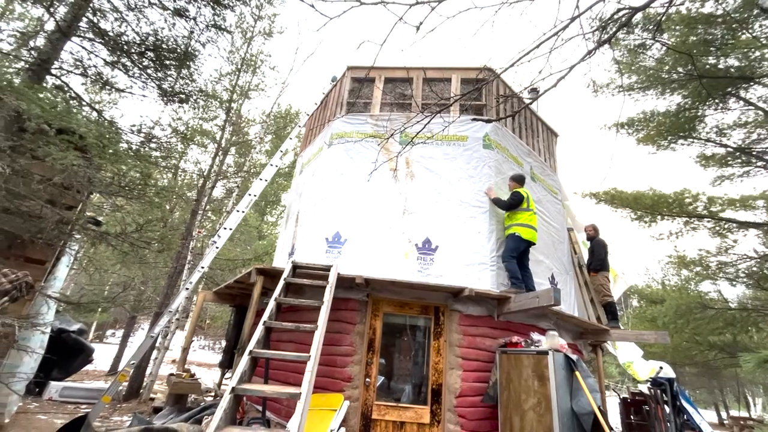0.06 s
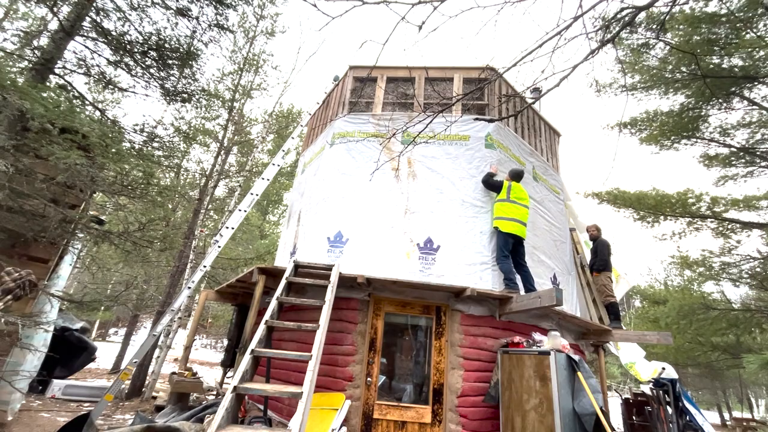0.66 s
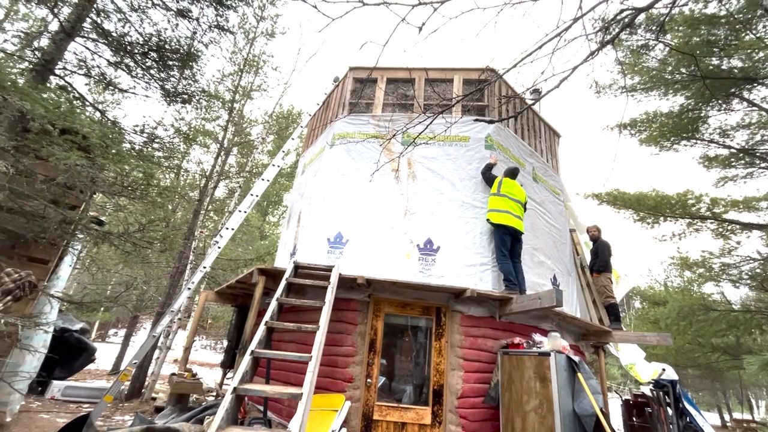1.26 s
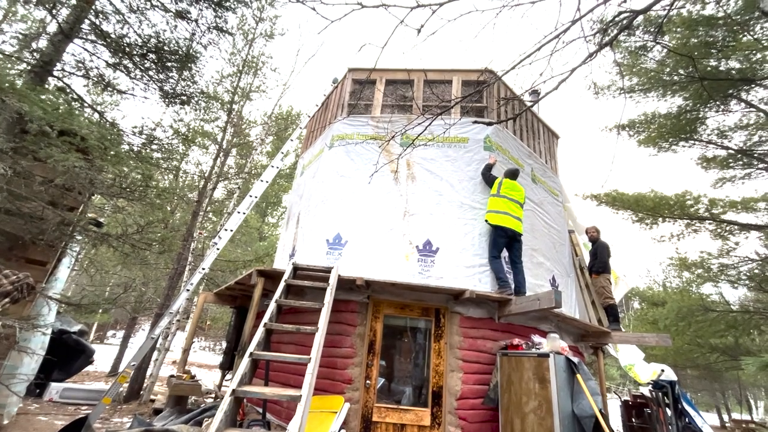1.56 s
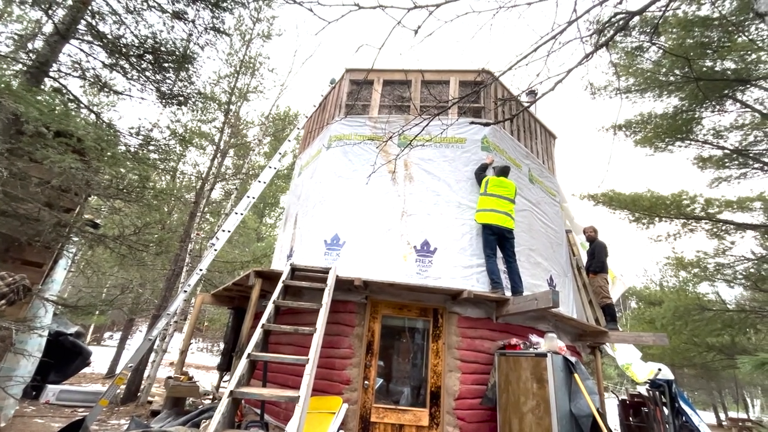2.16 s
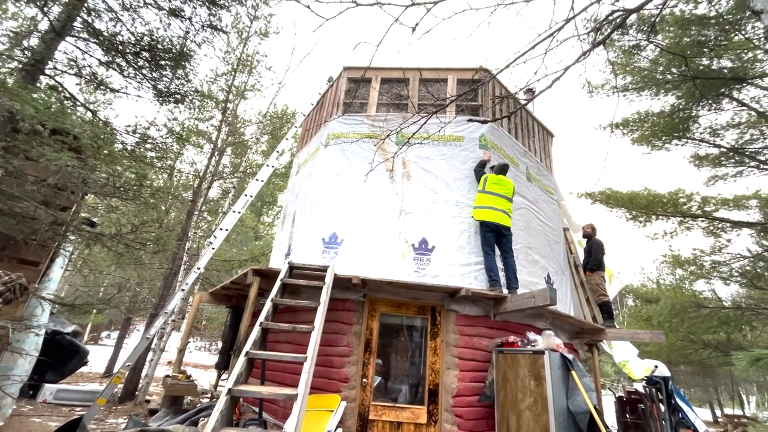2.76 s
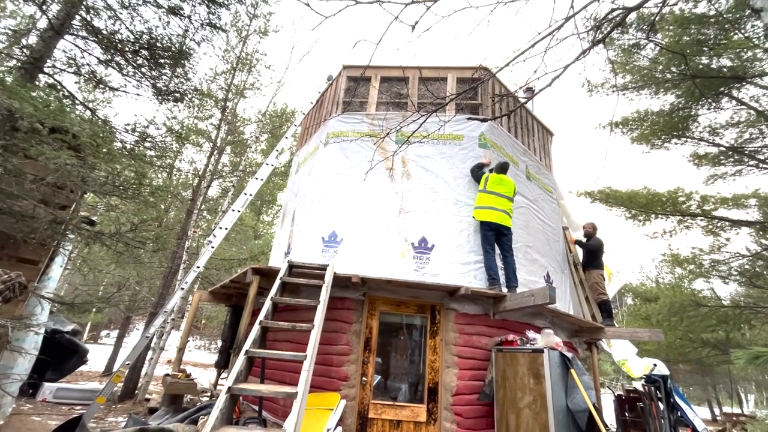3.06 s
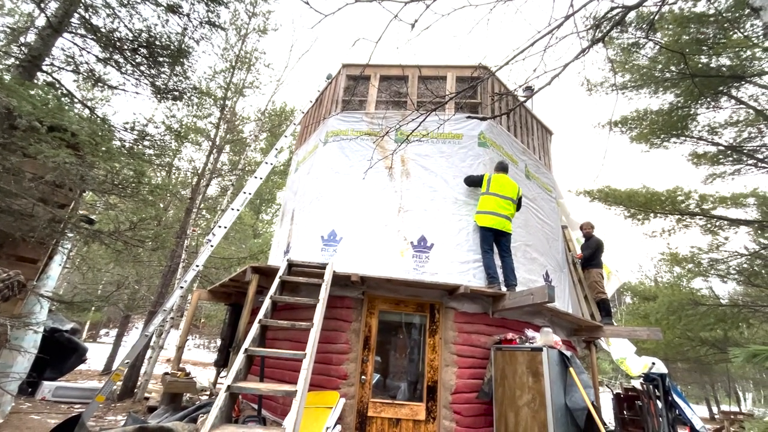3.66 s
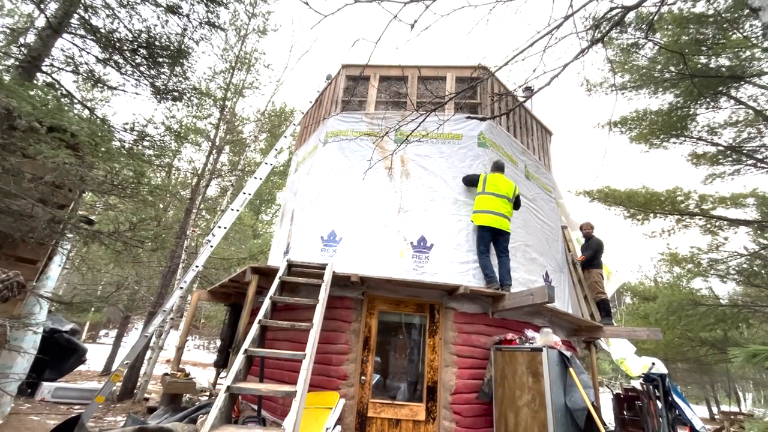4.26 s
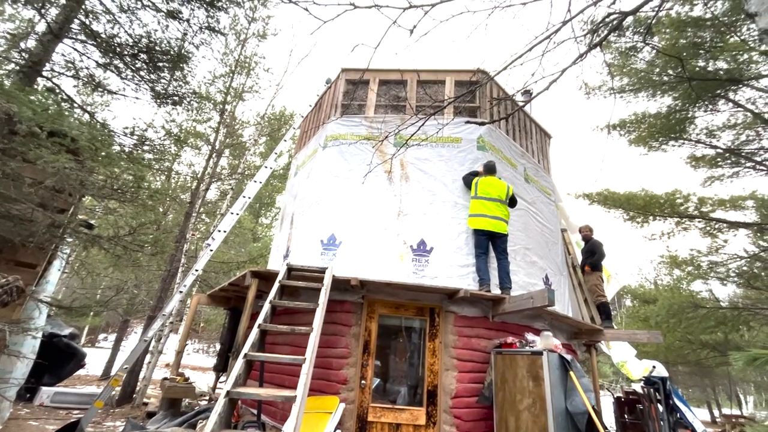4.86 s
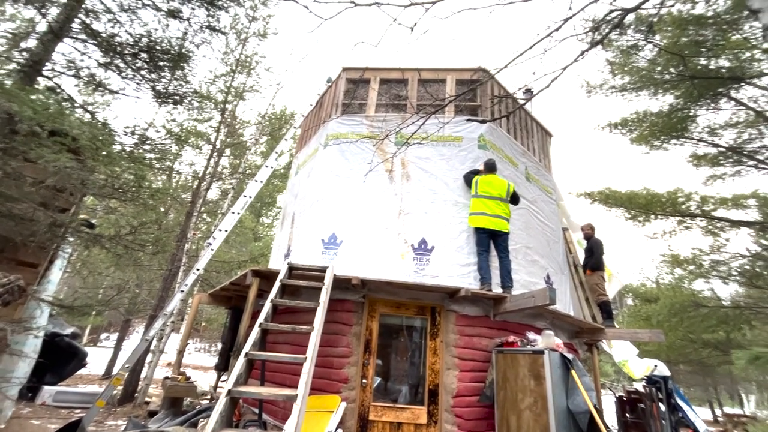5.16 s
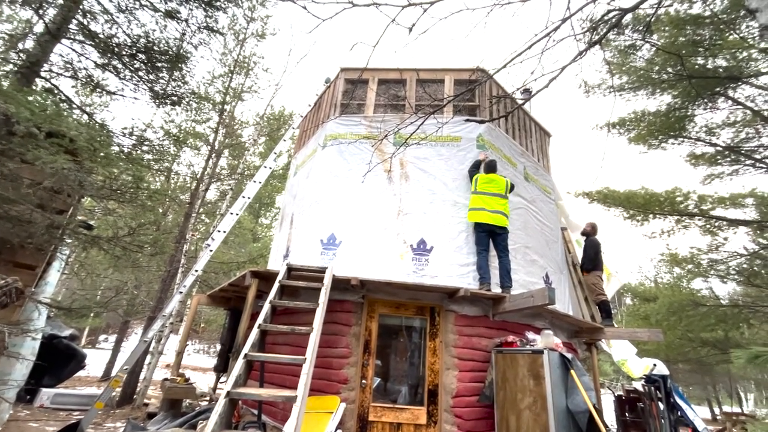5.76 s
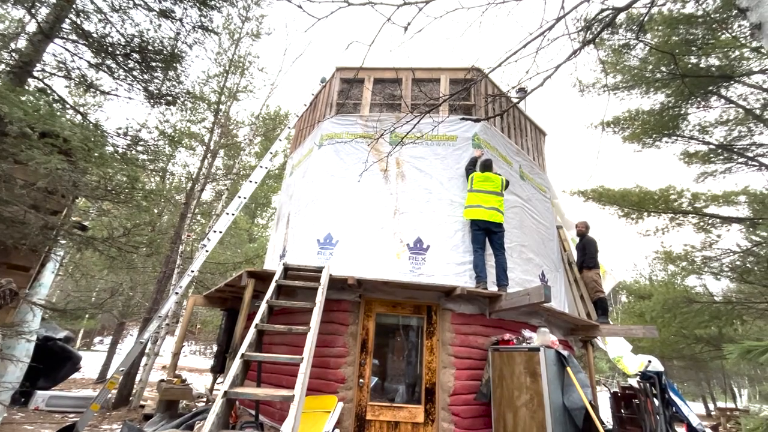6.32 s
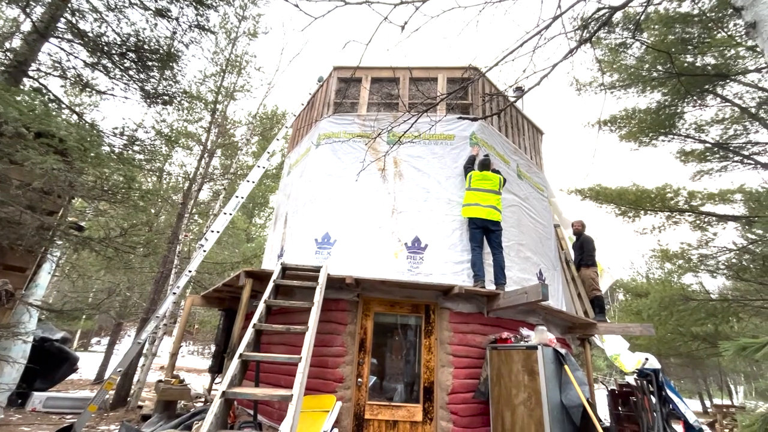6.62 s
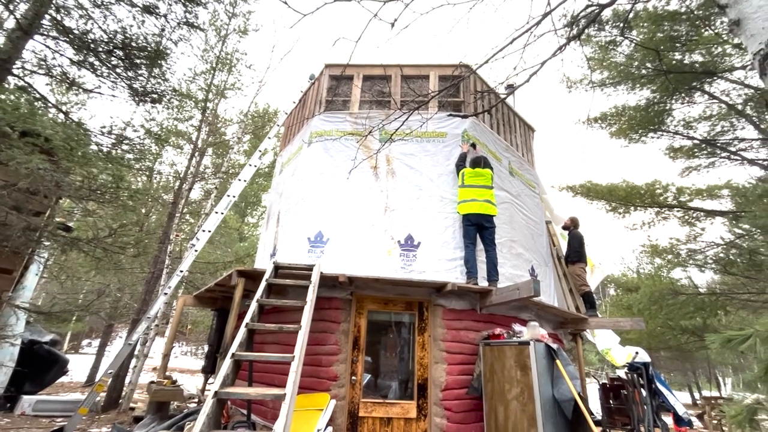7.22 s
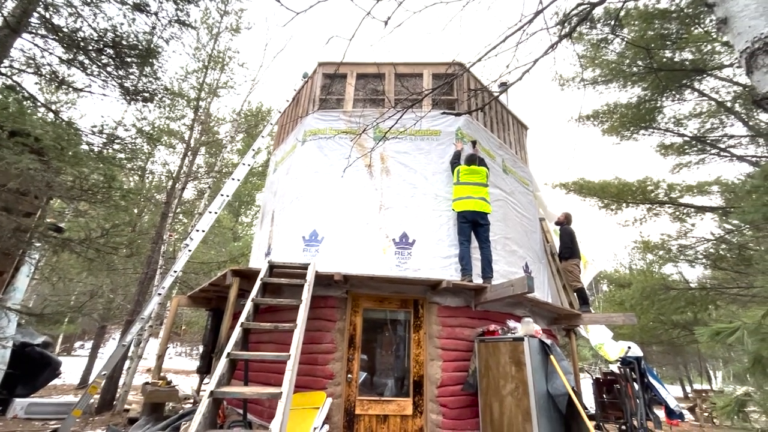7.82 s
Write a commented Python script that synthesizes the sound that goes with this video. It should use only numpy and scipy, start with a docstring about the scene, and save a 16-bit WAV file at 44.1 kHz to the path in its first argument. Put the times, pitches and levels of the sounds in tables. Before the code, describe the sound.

A staple gun snaps three times into a wooden wall outdoors, after faint rustling of plastic wrap, over a low steady engine hum.

```python
"""In a pine wood, over the throb of a far idling engine, a hand smooths house wrap on a cabin wall:
friction makes it hiss, folds crinkle, and hands and boots bump the boards. A small bird calls twice,
and a staple gun clicks as it is set in place. From five seconds on, some metres to the right, three
staples are shot into the boards. Each impact is a steel crack that sets gun and wall ringing in their
modes, and the trees scatter it back; between the shots the smoothing goes on."""
import sys
import numpy as np
from scipy import signal
from scipy.fft import rfft, irfft, next_fast_len
from scipy.io import wavfile
from scipy.ndimage import uniform_filter1d

SR = 44100
rng = np.random.default_rng(int(sys.argv[2]) if len(sys.argv) > 2 else 0)


def dump(signal):
    """Clip the signal to [-1, 1] and save it as 16-bit WAV at the path in sys.argv[1]."""
    limited = np.clip(np.atleast_2d(signal).T, -1, 1)
    pcm = np.round(limited * 32767).astype(np.int16)
    wavfile.write(sys.argv[1], SR, pcm)


N = 347810
TIME = np.arange(N) / SR

# The shots. Each row: start in seconds, burst length in seconds, crack level in dB, crack tilt in dB
# per octave, steel level in dB, wall level in dB, wall tilt in dB per octave, clatter level in dB.
SHOTS = [(5.0236, 0.0038, -20, -4, -41.5, -26, -2, -17), (6.3026, 0.0052, -14, 0, -29, -24, 1, -18),
         (7.61, .0044, -13.5, 2.8, -44.5, -26.5, -2, -19.5)]
# The driver meets the staple, seats it, hits its stop. Each row: fraction of the burst, gain in dB.
DRIVER_BLOWS = [(0, -5), (0.351, 0), (.85, -4.5)]
# Modes of steel gun and boarded wall. Each row: frequency in Hz, relative level in dB, T60 in seconds.
GUN_MODES = [(2030, -1, .15), (2950, 4.5, 0.28), (3314, 0.5, 0.27), (3680, 0, 0.18), (3940, -2.5, 0.26),
             (4257, -3, 0.16)]
WALL_MODES = [(199.9, -7, .4), (244.4, 1, .28), (303, 0.5, .3), (344.8, -1.5, .3), (547, 2, 0.11),
              (637, 3, 0.22), (914.5, 1.5, 0.18), (968, 0.5, 0.21), (1019, 0, 0.2)]
# Spectra of the crack, the sheet-steel housing and the echo from the trees.
# Each row: frequency in Hz, relative spectral density in dB.
CRACK_SPECTRUM = [(150, -20.5), (300, -1), (430, -3.5), (630, 4), (1500, -5.5), (2700, -6.5), (4000, -2.5),
                  (5200, -6.5), (8500, -13.5), (12000, -10), (16000, -27)]
HOUSING_SPECTRUM = [(2000, -19), (3000, -0.5), (4000, 0), (4600, -4), (5300, -25)]
ECHO_SPECTRUM = [(280, -14), (1000, 8), (1600, 0), (3900, -3), (6000, -8), (16000, -44)]
# Resonances of board and grip, one list for each shot. Each row: frequency in Hz, lift in dB.
SHOT_RESONANCES = [
    [(860, 7), (1060, 13.5), (3970, 11.5), (4330, 10), (5400, 6), (6330, 0.5)],
    [(770, -13), (905, 10.5), (3650, 10.5), (4270, 6.5), (6030, 8), (7680, 5.5)],
    [(268, 6.5), (720, -13), (850, 15.5), (3600, 1), (4060, 7), (4850, 8), (5450, 9.5)],
]

def staple_gun():
    """Impact excitation: spring-driven blows set gun and wall ringing; the trunks scatter it back."""
    out, t = np.zeros((2, N)), np.arange(2 ** 15) / SR
    for shot, resonances in zip(SHOTS, SHOT_RESONANCES):
        start, burst_s, crack_db, crack_tilt, steel_db, wall_db, wall_tilt, clatter_db = shot
        burst = sum(undb(db) * fade(t - place * burst_s, t60=.017) for place, db in DRIVER_BLOWS)
        crack = undb(crack_db) * noise(CRACK_SPECTRUM, len(t), crack_tilt) * burst
        # loosely joined steel parts split each mode into a close pair
        steel = sum(ring(GUN_MODES, t, scatter_db=3.5, rise_s=.00059, detune=.0027) for _ in range(2))
        wall = ring(WALL_MODES, t, scatter_db=1.5, rise_s=.0061, detune=.0043, tilt_db=wall_tilt)
        housing_decay = fade(t, t60=.09) + undb(-25) * fade(t, t60=.81)
        housing = undb(steel_db + 12.5) * noise(HOUSING_SPECTRUM, len(t)) * housing_decay
        ringing = housing + undb(wall_db) * wall + undb(clatter_db) * clatter(t)
        echo = undb(-45) * noise(ECHO_SPECTRUM, len(t)) * fade(t, t60=1.68) * rise(t, .03)
        coloured = resonate(crack, resonances) + resonate(ringing, resonances, share=.57)
        add(out, start, coloured + undb(steel_db) * steel + echo)
    return out

# Spectrum of the clatter. Each row: frequency in Hz, relative spectral density in dB.
CLATTER_SPECTRUM = [(40, -13), (80, -8), (130, -16), (270, 1), (450, -6), (630, -4.5), (1000, -6),
                    (1450, -10.5), (4000, -18), (5100, -20.5), (6400, -15.5), (9500, -26), (12000, -24),
                    (15500, -42.5)]
# Damping of the clatter. Each row: band centre in Hz, T60 in seconds.
CLATTER_T60 = [(80, 0.82), (280, 0.32), (900, 0.21), (3500, 0.31), (12000, 0.23)]

def clatter(t):
    """Modal overlap: boards, wrap and platform ring as noise whose lows build later and last longer."""
    hz, out = bins(len(t)), 0
    spectrum = rfft(noise(CLATTER_SPECTRUM, len(t), tilt_db=-.56)) * ripple(hz, depth_db=3)
    centres = np.array(CLATTER_T60)[:, 0]
    for (centre, t60), weights in zip(CLATTER_T60, np.eye(len(centres))):
        band = irfft(spectrum * at_hz(np.c_[centres, weights], hz), len(t))
        out = out + band * fade(t, t60) * rise(t, 1.5 / centre)
    return out

# Steel parts clicking as the gun is set to the wall, the wrap crinkling, hands and boots on the boards.
# Each row: time in seconds, relative level in dB.
GUN_CLICKS = [(2.6077, -39.5), (2.63, -40), (2.6459, -40.5), (4.6864, -44.5), (5.7324, -34.5),
              (6.8747, -28.5), (6.895, -35), (6.9316, -34), (6.954, -46)]
WRAP_CRINKLES = [(.432, -53), (.611, -43), (0.7592, -42.5), (0.8221, -39.5), (.902, -43), (.947, -51),
                 (1.2287, -50.5), (1.899, -47), (2.8499, -48.5), (3.0106, -43.5), (3.199, -44),
                 (3.381, -48.5), (4.458, -44.5), (4.483, -52), (5.4678, -43.5), (5.9356, -49), (6.021, -52)]
BOARD_BUMPS = [(0.431, -46.5), (1.605, -50.5), (0.824, -44), (1.189, -46), (1.363, -47.5), (1.947, -41),
               (2.402, -47.5), (2.48, -54), (3.385, -47), (3.564, -52), (3.729, -53), (4.424, -49),
               (4.965, -40)]
# Spectra of sharp ticks and dull bumps. Each row: frequency in Hz, relative spectral density in dB.
TICK_SPECTRUM = [(900, -6.5), (3500, -14), (4300, 4.5), (5400, -6), (6700, -4), (9500, -16), (12000, -9),
                 (16000, -18)]
BUMP_SPECTRUM = [(120, -7), (300, 5.5), (550, 0.5), (1050, 6), (1500, -12.5), (4000, -10), (10000, -29)]

def contacts():
    """Transient excitation: crinkles and clicks are brief and bright, bumps slower and duller."""
    crinkles = taps(WRAP_CRINKLES, TICK_SPECTRUM, rise_s=.00022, t60=.0084, tail_db=-15.5, tail_t60=.22)
    clicks = taps(GUN_CLICKS, TICK_SPECTRUM, rise_s=.00082, t60=.0094, tail_db=-22, tail_t60=.18)
    bumps = taps(BOARD_BUMPS, BUMP_SPECTRUM, rise_s=.0014, t60=.05, tail_db=-8.5, tail_t60=.59)
    return undb(3.5) * crinkles + undb(5) * clicks + undb(.5) * bumps

def taps(events, spectrum, rise_s, t60, tail_db, tail_t60):
    """Double-slope decay: each noisy contact dies quickly and leaves a faint tail off the wall."""
    out, t = np.zeros((2, N)), np.arange(2 ** 13) / SR
    envelope = (fade(t, t60) + undb(tail_db) * fade(t, tail_t60)) * rise(t, rise_s)
    for start, db in events:
        add(out, start - .001, undb(db) * noise(spectrum, len(t)) * envelope)
    return out

# Swells of hiss, mostly from smoothing the wrap; the one at 6.33 s is a faint hiss lingering after the
# second shot. The gun's nose scrapes once along the boards.
# Each row: start in seconds, length in seconds, relative level in dB, T60 of the run-out in seconds.
HISS_SWELLS = [(-.25, 0.61, -59, 3.4), (0.457, 0.47, -58.5, 1.6), (2.136, 0.27, -68, 3.6),
               (2.765, 0.016, -62, 0.16), (2.872, 0.25, -60, 6.1), (3.153, 0.18, -65.5, 1.1),
               (4.02, 0.1, -63, 0.94), (4.223, 0.34, -60.5, 0.49), (5.22, 0.45, -58.5, 1.4),
               (5.895, 0.23, -68, 0.24), (6.33, .2, -68.5, 11.3), (6.83, 0.22, -63.5, 1.2)]
NOSE_SCRAPE = (5.17, .52, -61.5, .7)
# Spectrum of the rubbing. Each row: frequency in Hz, relative spectral density in dB.
RUB_SPECTRUM = [(210, -17.5), (350, -5), (639, -5.5), (1020, -3), (1800, -13), (2900, -12.5), (4270, -9.5),
                (7440, -19), (11800, -21.5), (14000, -27.5)]
# Resonances of the taut wrap and of the scraping nose. Each row: frequency in Hz, lift in dB.
WRAP_RESONANCES = [(4400, -1), (5400, 3)]
SCRAPE_RESONANCES = [(1090, 19), (4300, 15)]

def rubbing(folds_per_s=110, fold_decay_s=.0011):
    """Stick-slip friction: wrap hisses, folds pop, the gun scrapes. A hiss also lingers after shot two."""
    stir = undb(-88)  # the loose wrap at rest
    envelope = np.sqrt(stir ** 2 + sum(swell(*row) ** 2 for row in HISS_SWELLS))
    slips = undb(2.1 * rng.exponential(size=N // 32 + 1)).repeat(32)[:N]
    pops = (rng.random(N) < folds_per_s / SR) * rng.random(N) ** 2
    folds = signal.lfilter([1], [1, -np.exp(-1 / (fold_decay_s * SR))], pops)
    hiss_spectrum = rfft(noise(RUB_SPECTRUM, N, grain=slips)) * ripple(bins(N), depth_db=3.5)
    hiss = irfft(hiss_spectrum, N) * undb(6 + wander(45))
    rustle = resonate(hiss, WRAP_RESONANCES) + undb(-8) * noise(TICK_SPECTRUM, N, grain=folds)
    scrape = resonate(noise(RUB_SPECTRUM, N, grain=slips * wander(330)), SCRAPE_RESONANCES)
    return rustle * envelope + scrape * swell(*NOSE_SCRAPE)

def swell(start, length, db, t60, attack_share=.58):
    """Amplitude envelope: the level builds, holds steady, then runs out."""
    t = TIME - start
    attack = np.sin(np.pi / 2 * np.clip(t / (attack_share * length), 0, 1))
    return undb(db) * attack * fade(np.maximum(t - length, 0), t60)

# Creaks of boards and wrap. Each row: time of the peak in seconds, half-width in seconds,
# frequency in Hz, frequency spread in Hz, level in dB.
CREAKS = [(0.003, .03, 283, 6, -38), (7.135, .04, 403, 6, -53), (7.14, .055, 2170, 150, -58)]

def creaks():
    """Narrow-band vibration: brief tones of unsteady pitch swell and fade."""
    out = 0
    for peak_s, half_width_s, hz, spread_hz, db in CREAKS:
        tone = np.sin(2 * np.pi * np.cumsum(hz + spread_hz * wander(spread_hz * 2)) / SR)
        out = out + undb(db) * tone * np.exp(-((TIME - peak_s) / half_width_s) ** 2)
    return out

# The bird's calls. Each row: start in seconds, level in dB.
BIRD_CALLS = [(1.455, -60), (4.824, -54)]
# Contour of one call. Each row: time from its start in seconds, frequency in Hz, gain in dB.
CALL_CONTOUR = [(0, 6400, -16), (0.012, 7200, -3), (0.031, 7080, -4), (.05, 7600, -5), (.11, 7500, -22)]

def bird():
    """Frequency and amplitude modulation: each thin call glides upward while its level flutters."""
    out, t = np.zeros((2, N)), np.arange(SR // 8) / SR
    times, hz, db = np.transpose(CALL_CONTOUR)
    tone = np.sin(2 * np.pi * np.cumsum(np.interp(t, times, hz)) / SR)
    for start, call_db in BIRD_CALLS:
        flutter = unit_rms(uniform_filter1d(rng.standard_normal((2, len(t))), size=160))
        add(out, start, tone * undb(call_db + np.interp(t, times, db)) * (1 + .5 * flutter))
    return out

# Idling speed. Each row: time in seconds, cycle rate in Hz.
IDLE_RATE = [(0, 22.65), (1.1, 22.8), (3, 22.9), (7.89, 22.85)]
# Harmonics of the exhaust. Each row: multiple of the cycle rate, relative level in dB.
EXHAUST_ORDERS = [(2, 1.5), (3, -7), (5, -1), (6, -8.5), (7, 0), (8, -3), (9, 0.5)]

def engine():
    """Harmonic series: only the low orders of the far exhaust pulses carry, each wavering on the way."""
    cycles = np.cumsum(np.interp(TIME, *np.transpose(IDLE_RATE))) / SR
    throb = 0
    for order, db in EXHAUST_ORDERS:
        smear = .22 * order ** 2  # the exhaust resonance shifts each phase, spreading the pulse
        throb = throb + undb(db + .7 * wander(3)) * np.cos(2 * np.pi * order * cycles + smear)
    return undb(-51) * unit_rms(throb)

# Spectra of the wood's air and its rumble. Each row: frequency in Hz, relative spectral density in dB.
AIR_SPECTRUM = [(30, -41.5), (200, -5), (400, -7.5), (1030, -3), (1170, -11.5), (1350, 0), (1600, -9.5),
                (5200, -24), (12000, -47), (15000, -65)]
RUMBLE_SPECTRUM = [(32, -39.5), (45, -1.5), (110, 1.5), (300, -5), (420, -26), (4000, -78)]

def woodland_air():
    """Ambient noise: the quiet broadband air of the wood lies over a low rumble."""
    air = noise(AIR_SPECTRUM, N) * undb(-61 + .21 * wander(.91))
    rumble = noise(RUMBLE_SPECTRUM, N) * undb(-53.5 + .6 * wander(7.6))
    return air + rumble

# Incoherence of the two microphone ports. Each row: frequency in Hz, unrelated fraction of the power.
PORT_INCOHERENCE = [(50, .01), (220, 0.054), (380, 0.6), (900, 0.019), (2000, 0.72), (7000, 0.69),
                    (12000, 0.078)]

def noise(spectrum, size, tilt_db=0, grain=1):
    """Partial coherence: two ports share part of a noise, shaped in time by grain and then coloured."""
    padded = next_fast_len(size, True)
    hz = bins(padded)
    white = rfft(rng.standard_normal((3, size)) * grain, padded)
    unrelated = np.clip(at_hz(PORT_INCOHERENCE, hz), 0, 1)
    pair = np.sqrt(1 - unrelated) * white[0] + np.sqrt(unrelated) * white[1:]
    octaves = np.log2(np.maximum(hz, 100) / 1000)
    return unit_rms(irfft(pair * undb(at_hz(spectrum, hz) + tilt_db * octaves), padded)[:, :size])

def ring(modes, t, scatter_db, rise_s, detune, tilt_db=0):
    """Superposition of damped modes: each blow lands elsewhere, so weights, pitches and phases vary."""
    hz, db, t60 = np.transpose(modes)[:, :, None]
    weight, pitch, phase = rng.standard_normal((3, len(modes), 1))
    waves = np.sin(2 * np.pi * (hz * (1 + detune * pitch) * t + phase))
    gain = undb(db + scatter_db * weight + tilt_db * np.log2(hz / hz.mean()))
    return np.sum(gain * waves * fade(t, t60), axis=0) * rise(t, rise_s)

def resonate(x, resonances, share=1, q=15.5):
    """Resonant filtering: each narrow band is raised or damped by a share of its lift in dB."""
    for hz, db in resonances:
        x = x + (undb(share * db) - 1) * signal.lfilter(*signal.iirpeak(hz, q, fs=SR), x)
    return x

def ripple(hz, depth_db):
    """Modal interference: crowded resonances leave peaks and gaps, shallower below 1 kHz."""
    grid_hz = np.arange(0, SR / 2, 45)
    peaks = np.interp(hz, grid_hz, rng.standard_normal(len(grid_hz)))
    return undb(depth_db * peaks * np.minimum(hz / 1000, 1))

def wander(rate_hz):
    """Low-pass noise: a smooth random drift of rms 1."""
    hold = int(SR / rate_hz)
    steps = np.repeat(rng.standard_normal(N // hold + 1), hold)
    return unit_rms(uniform_filter1d(steps, hold)[:N])

def fade(t, t60):
    """Exponential decay from t = 0, falling 60 dB in t60 seconds."""
    return (t >= 0) * np.exp(-np.log(1000) * np.maximum(t, 0) / t60)

def rise(t, rise_s):
    """Exponential build-up with time constant rise_s."""
    return 1 - np.exp(-t / rise_s)

def add(out, start_s, sound):
    """Superposition: a sound joins the mix at its start time."""
    i = max(int(start_s * SR), 0)
    out[:, i:i + sound.shape[-1]] += sound[..., :N - i]

def undb(db):
    """Amplitude ratio of a level in decibels."""
    return 10 ** (np.asarray(db) / 20)

def unit_rms(x):
    """Normalisation to rms 1."""
    return x / np.sqrt(np.mean(x ** 2))

def at_hz(points, hz):
    """Interpolation of (Hz, value) points on a log-frequency axis."""
    f, value = np.transpose(points)
    return np.interp(np.log(np.maximum(hz, 1)), np.log(np.maximum(f, 1)), value)

def bins(size):
    """Fourier frequencies in Hz for size samples."""
    return np.fft.rfftfreq(size, 1 / SR)

# Phase difference between the ports. Each row: frequency in Hz, left minus right phase in radians.
PORT_PHASE = [(220, 0), (350, -.5), (600, -1.55), (1100, -2.2), (1900, -3.4), (2900, -8.8), (4400, -12.8),
              (6600, -18.8), (7400, -20.5), (11000, -19), (14000, -15.8)]
# Level difference between the ports. Each row: frequency in Hz, left minus right level in dB.
PORT_BALANCE = [(40, .3), (130, 1.5), (270, 4.8), (600, -2), (1100, -1), (2600, 1.8), (4100, -1.5),
                (6500, -5), (12000, -1)]

def scene():
    """Path difference and shadowing: sound reaches the right port first; the camera body shades each."""
    sound = staple_gun() + rubbing() + engine() + bird() + creaks() + woodland_air() + contacts()
    hz = bins(N)
    balance_db = at_hz(PORT_BALANCE, hz) / 2
    left = undb(balance_db) * np.exp(1j * at_hz(PORT_PHASE, hz))
    right = undb(-balance_db)
    return irfft(rfft(sound) * np.array([left, right]), N)

def record(dry, bass_hz=35, top_hz=15900, ceiling=.92):
    """Band limiting and saturation: the deepest bass is dropped, peaks are rounded, the top is cut."""
    lean = signal.sosfilt(signal.butter(6, bass_hz, "high", fs=SR, output="sos"), dry)
    rounded = lean / (1 + (lean / ceiling) ** 4) ** .25
    return signal.sosfilt(signal.ellip(8, .2, 70, top_hz, fs=SR, output="sos"), rounded)

dry = scene()
out = record(dry)
dump(out)
```